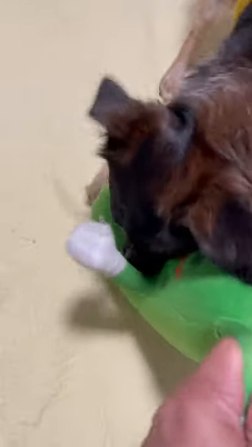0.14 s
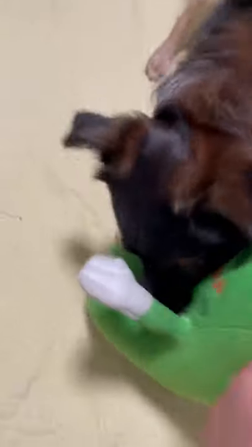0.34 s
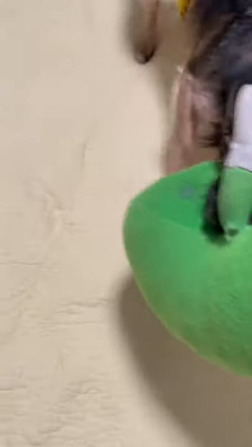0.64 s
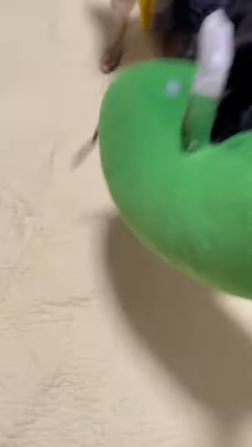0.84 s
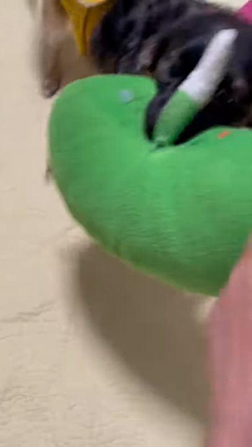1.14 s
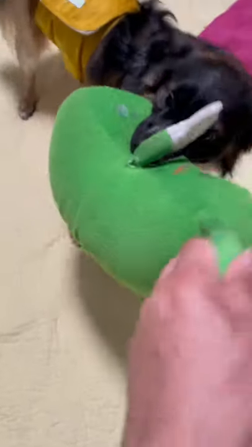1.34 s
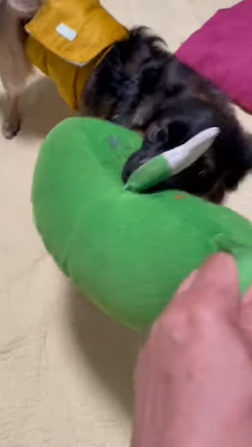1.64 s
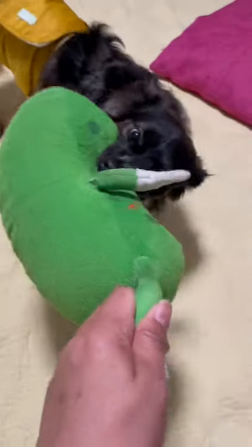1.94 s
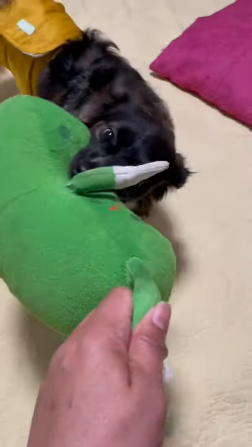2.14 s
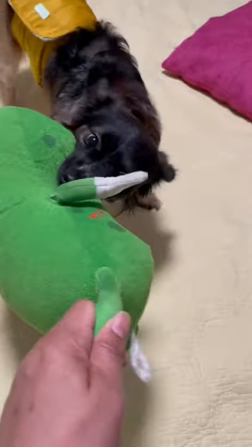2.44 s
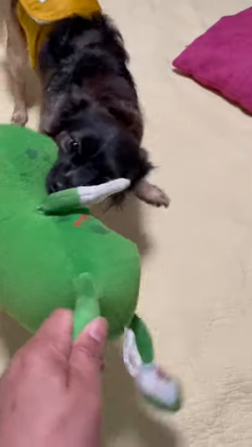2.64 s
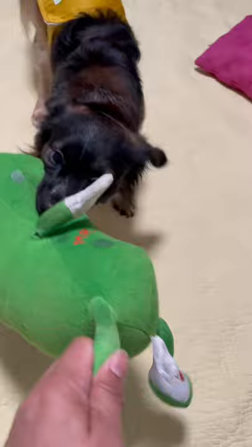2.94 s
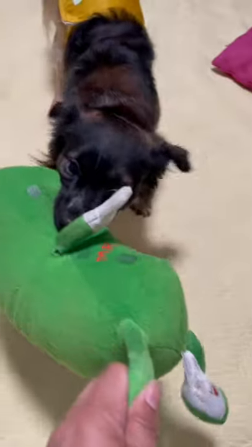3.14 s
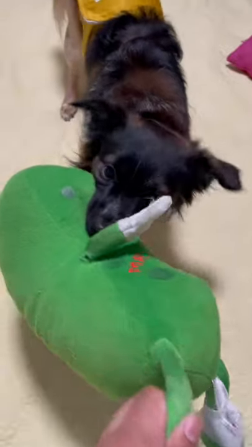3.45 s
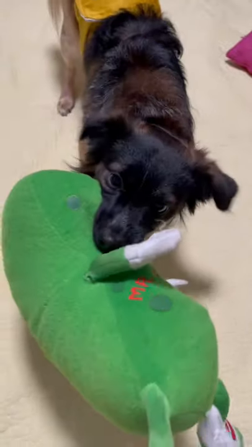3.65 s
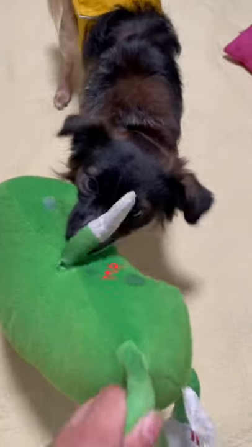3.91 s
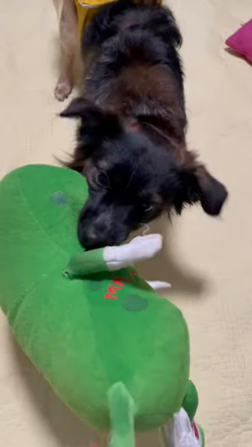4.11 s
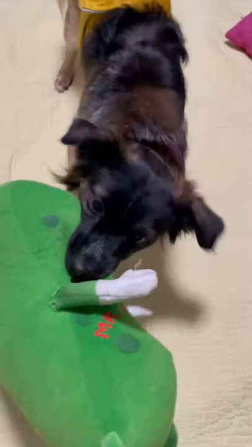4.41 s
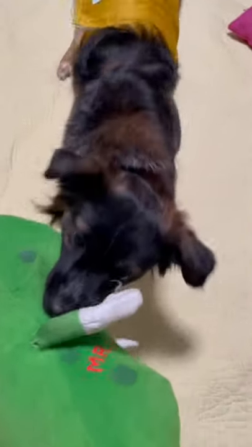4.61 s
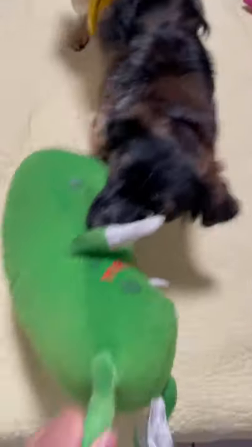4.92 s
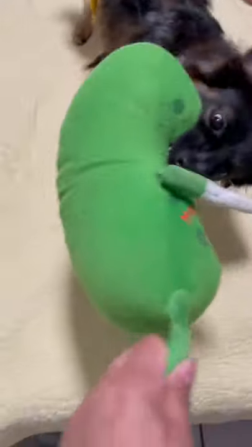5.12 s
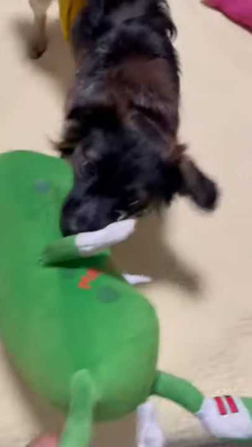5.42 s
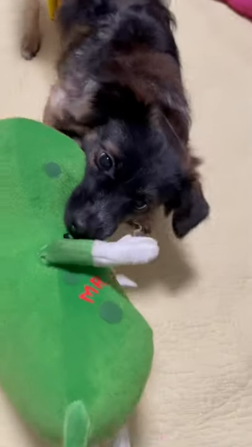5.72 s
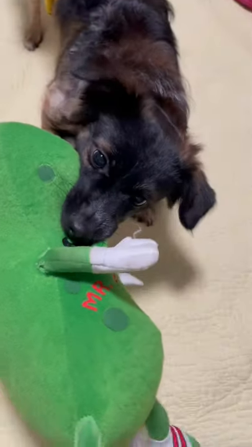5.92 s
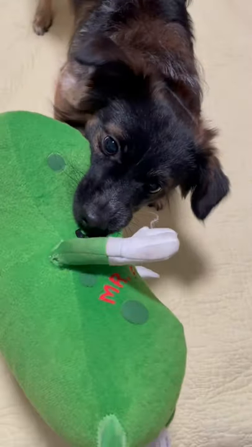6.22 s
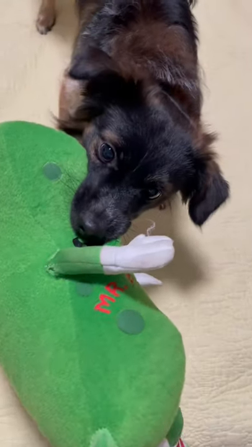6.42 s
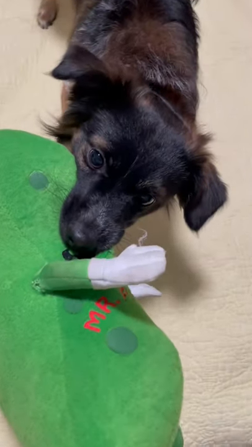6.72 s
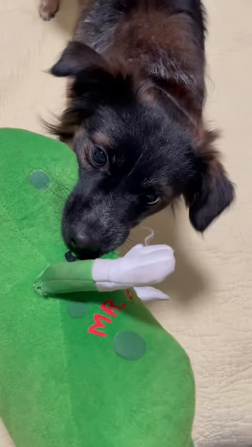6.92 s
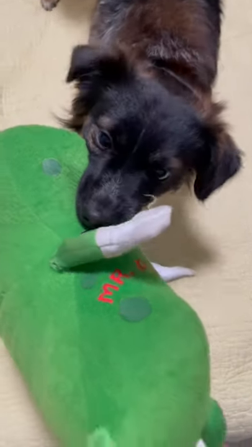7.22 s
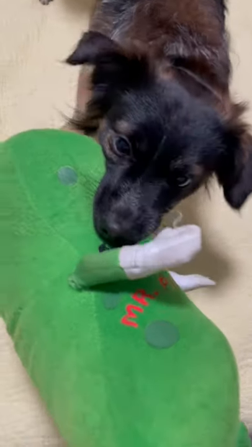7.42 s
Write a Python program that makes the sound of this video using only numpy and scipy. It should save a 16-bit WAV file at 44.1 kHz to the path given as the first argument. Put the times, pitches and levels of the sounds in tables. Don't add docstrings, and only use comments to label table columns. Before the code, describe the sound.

A puppy with a plush toy in its jaws growls close to a phone in a quiet, soft-furnished bedroom. A clipped growl and low mutter lead into the loudest, open-mouthed snarl, then separate bouts follow, some brief, some long and fluttering. One airy sniff falls between them. Fabric rustles softly under the tugging, over a faint low hum and steady hiss.

```python
import sys
import numpy as np
from scipy import signal
from scipy.fft import rfft, irfft, next_fast_len
from scipy.io import wavfile
from scipy.ndimage import map_coordinates

SR = 44100
rng = np.random.default_rng(int(sys.argv[2]) if len(sys.argv) > 2 else 0)


def master_out(mix):
    frames = np.transpose(np.atleast_2d(mix))
    ceiling = np.clip(frames, -1, 1)
    pcm = np.round(ceiling * 32767).astype(np.int16)
    wavfile.write(sys.argv[1], SR, pcm)


def gain_from_db(level_db):
    decades = np.asarray(level_db, float) / 20
    return 10 ** decades


N = 333396

# centre_hz, width_hz, level_db
CHEST = [(105, 55.8, 3), (170, 75.5, 3.5), (258, 49.8, 3), (402.1, 23.6, -5)]
# centre_hz, width_hz, level_db
NOSE = [(1600, 200, 12.5), (1639, 417, 10.5), (2370, 270, 4)]
# time_s, level_db, pitch_hz
MUTTER = [
    (.1, -49, 1890),
    (.16, -42.5, 1747),
    (.3, -49, 1416),
    (.36, -58, 1391),
]
# time_s, peak_db, bright_db
PALATE_SLAPS = [(0.017, -23, -21), (0.076, -33, -19), (0.093, -49, -9), (0.111, -35, -5), (0.127, -34, -8),
                (0.152, -32, -12), (0.17, -30, -15), (0.266, -29.5, -25), (0.298, -30, -18), (0.365, -29, -27),
                (0.407, -22, -18), (0.419, -15.5, -20), (0.432, -6.5, -27), (0.458, -7.5, -31),
                (0.497, -6.5, -29), (0.567, -14, -13), (0.618, -37, -18), (0.66, -15, -13), (0.711, -27, -18),
                (0.728, -30, -25), (0.799, -20, -21), (0.872, -27, -8), (0.908, -26, -6), (0.93, -31, -18),
                (0.946, -23, -4), (0.963, -26, -15), (0.99, -30, -19), (1.012, -17.5, -11), (1.03, -44, -8),
                (1.055, -30, -11), (1.073, -33, -4.5), (1.099, -30, -9), (1.115, -33, -22), (1.135, -37, -20),
                (1.155, -38, -21), (1.175, -23, -18), (1.202, -28, -29), (1.227, -25, -14.5), (1.266, -37, -4),
                (1.285, -38, -13), (1.332, -49, -14), (1.343, -46, -7),
                (1.735, -43, -11), (1.755, -32, -18), (1.763, -28, -24), (1.797, -27.5, -14), (1.872, -23, -10),
           (1.914, -30, -17), (1.96, -39, -16), (1.971, -39, -23), (2.02, -34, -30), (2.057, -48, -19),
           (2.123, -32, -35), (2.245, -47, -9), (2.537, -39.5, 3.5), (2.555, -26, -13), (2.575, -32.5, 2),
           (2.591, -20.5, -9), (2.611, -27.5, -1), (2.633, -22, -28), (2.659, -29, -3), (2.71, -43, -3),
           (2.735, -34, -6), (2.754, -32.5, -14), (2.779, -31, -5), (2.817, -33, -4), (3.352, -39, 0),
           (3.371, -27, -7.5), (3.416, -28, -9), (3.449, -45, -8), (3.523, -21.5, -9), (3.564, -29.5, -1.5),
           (3.585, -23, -18), (3.608, -33, -13), (3.628, -27.5, -28), (3.663, -28, -19), (3.674, -27, -6),
           (3.696, -25.5, -4.5), (3.718, -27, -19), (3.739, -28.5, -9.5), (3.782, -30, -13),
           (3.801, -28, -8.5), (3.835, -29, -24), (3.859, -35, -8), (3.871, -31, -3), (3.903, -27, -21),
           (3.936, -30, -22), (3.96, -37, -19),
                (4.335, -34, -1), (4.351, -30, -12), (4.381, -18, -21), (4.444, -16.5, -15), (4.474, -14.5, -13),
           (4.515, -23, -10), (4.546, -21, -4), (4.568, -22.5, -10), (4.592, -30, 3), (4.627, -37, 1.5),
           (4.642, -33, 3), (4.666, -34, 2), (4.68, -30.5, -0.5), (4.712, -29.5, -8), (4.751, -24.5, -5.5),
           (4.798, -28.5, -14), (5.082, -42, -14), (5.119, -37, -14), (5.15, -38, -10), (5.244, -32, 2),
           (5.301, -39, -17), (5.315, -34, -3), (5.371, -39, -14), (5.439, -50, 10), (5.566, -39, -7),
           (5.594, -48, -14), (5.624, -19.5, -13), (5.642, -25.5, -6), (5.658, -24, -17), (5.68, -33, 2),
           (5.824, -28.5, -17), (5.863, -29, -9), (5.902, -31, -12), (5.941, -38, -9), (5.97, -43, -7),
           (5.984, -29.5, -18), (6.032, -29.5, -23), (6.074, -34, -19), (6.195, -36, -22),
           (6.237, -32, -26), (6.256, -40, -18), (6.285, -43, -16),
                (6.783, -45, -2), (6.797, -38, -5), (6.82, -42, 2), (6.837, -28, -10), (6.871, -22, -8),
           (6.889, -34, -8), (6.925, -20, -9), (6.952, -27.5, -2.5), (6.983, -25.5, -6.5),
           (7.013, -38, -16), (7.036, -36.5, 5), (7.074, -33, -10), (7.091, -35, -23), (7.112, -24, -5.5),
           (7.128, -19.5, -12), (7.15, -25.5, -6), (7.174, -26, -15), (7.194, -25, -7.5), (7.213, -31, -23),
           (7.233, -27, -4.5), (7.275, -38, -6), (7.308, -37.5, -2), (7.391, -39, -10), (7.428, -32, -19),
           (7.447, -43, -10)]
SINGLE_SLAPS = np.array(PALATE_SLAPS)


def growl(jitter=.08, weak_db=-7, scatter_db=1.9, flutter_db=2.2, spit_db=1, breath=.22):
    # time_s, effort_db, fold_rate_hz, mouth_opening_db
    loudest = [
        [(.415, -31, 213.5, -14), (.44, -25.5, 269.5, 2.5), (.47, -32, 225.4, -1.5), (.5, -29, 203.5, -3),
         (.525, -29, 164.9, 1), (.57, -25.5, 148, -7), (.62, -27, 177, -4), (.69, -29.5, 189.8, -4),
         (.78, -32.5, 153.6, -2)],
        [(.795, -31, 166.3, -7.5), (.87, -32, 149.4, -7.5), (.95, -32.5, 139.5, -10.5),
         (1.03, -33, 160.4, -6.5), (1.13, -34.5, 190.7, -24), (1.2, -34, 141.5, -14.5),
         (1.25, -33.5, 192.7, -15), (1.3, -35, 162, -16), (1.36, -33.5, 158.1, -12)],
    ]
    # time_s, effort_db, fold_rate_hz, mouth_opening_db
    long_growls = [
        [(3.38, -34, 178.4, -17), (3.422, -37.5, 177.3, -12.5), (3.458, -35.5, 149.4, -9),
         (3.482, -34, 150.8, -15), (3.548, -35.5, 183.1, -16), (3.864, -36, 163.3, -20.5),
         (3.99, -40.5, 150.8, -23)],
        [(4.35, -35, 176.8, -13), (4.396, -30.5, 172.6, -12.5), (4.47, -28.5, 180.3, -16.5),
         (4.506, -27.5, 147.3, -18.5), (4.686, -34, 185.9, -20), (4.788, -30, 147, -25),
         (4.8, -36, 150.3, -16.5)],
        [(5.595, -36.5, 171.2, -15), (5.659, -33, 148.5, -13.5), (5.869, -39.5, 156.9, -17),
         (5.961, -36.5, 148, -19.5), (6.003, -42.5, 129.9, -42), (6.235, -44, 160.3, -17),
         (6.29, -42, 151.3, -40)],
        [(6.825, -39, 142.2, -7), (6.905, -36, 136.5, -14.5), (7.017, -34.5, 170, -18),
         (7.095, -32.5, 171, -12), (7.135, -31.5, 145.8, -33), (7.273, -41, 133.3, -7.5),
         (7.4, -39.5, 148, -18.5), (7.475, -46.5, 147.4, -16)],
    ]
    # time_s, effort_db, fold_rate_hz, mouth_opening_db
    short_growls = [
        [(0.0, -13, 200.8, -27), (0.024, -41, 193, -1.5), (0.05, -42.5, 196, -2.5)],
        [(0.11, -32, 182.6, -11), (0.168, -31, 174.3, -17), (0.242, -35.5, 194.8, -8), (0.33, -45, 184.3, -12)],
        [(1.76, -35.5, 182.4, -16.5), (2.024, -38.5, 184.6, -29), (2.076, -39, 152.8, -36),
         (2.16, -43, 157.9, -29)],
        [(2.57, -34, 157.8, -18), (2.656, -36, 155.8, -5.5), (2.73, -37, 182.2, -5.5),
         (2.8, -37.5, 149.3, -6.5)],
        [(3.07, -56, 137, 6), (3.1, -54, 134.5, 0), (3.11, -44.5, 136.2, -15)],
        [(5.11, -37.5, 173.2, -19), (5.198, -37, 181.7, -9.5), (5.236, -33, 156.6, -23),
         (5.36, -42.5, 161.8, -7.5)],
    ]
    # centre_hz, width_hz, level_db
    throat_modes = [(385, 114, 0)]
    growls = sorted(loudest + long_growls + short_growls)

    rate_hz = curve(np.vstack(growls), 2)
    turns = np.cumsum(rate_hz * (1 + jitter * wobble(90) + .045 * wobble(30))) / SR
    beats = np.flatnonzero(np.diff(np.floor(turns)))
    chance = rng.standard_normal((N // 100, 2))[:len(beats)]
    weak = np.arange(len(beats)) % 2

    flutter = np.sin(2 * np.pi * np.cumsum(26 + 7 * wobble(12)) / SR)
    flutter = flutter * (1.55 + 0.91 * wobble(6.9))
    flutter = np.clip(flutter, -1.5, .8) * (chop() == 0)

    folds, spits = np.zeros(N), np.zeros(N)
    folds[beats] = gain_from_db(weak_db * weak + scatter_db * chance[:, 0] + flutter_db * flutter[beats])
    spits[beats] = gain_from_db(-7 * weak + spit_db * chance[:, 1] + 1.4 * flutter[beats])
    boom = unit(steep(resonant(folds, CHEST), 74, 469))
    chest = strained(boom, level(growls)) * gain_from_db(2 * chop())

    puffs = unit(puffed(spits, .0045))
    stream = unit(gain_from_db(3.5 * flutter) * rng.standard_normal(N))
    low = .7 * unit(spits) + .7 * puffs + .7 * breath * stream
    high = .3 * unit(spits) + puffs + 1.8 * breath * stream
    opening = gaps()
    low, high = opening * low, opening * high

    mouth = unit(mouthed(low, 473, 1540)) * outlet(growls, follows=0.51, axis=0)
    nose = unit(steep(resonant(high, NOSE), 1570, 2550)) * outlet(growls, follows=1.19, axis=1)
    muzzle = unit(steep(muzzled(high), 2530, 7400)) * outlet(growls, follows=1.65, axis=2)
    throat = unit(resonant(resonant(folds, throat_modes), throat_modes))
    throat = throat * outlet(growls, follows=0, axis=3) * gain_from_db(chop())
    caught = catches()
    chest, mouth = turned(chest) * caught, mouth * caught
    return gain_from_db(-10.5) * mouth - gain_from_db(0.15) * chest + gain_from_db(-18) * nose + gain_from_db(-13.5) * muzzle + throat


def strained(chest, gain):
    split_hz, from_db, strain_db_per_db = 213, -33, 0.54
    low = filtered(chest, lambda hz: 1 / (1 + (hz / split_hz) ** 4))
    tilt = np.clip(gain / gain_from_db(from_db), .3, 3) ** strain_db_per_db
    return gain * (low / tilt + (chest - low) * tilt)


def outlet(growls, follows, axis):
    # mouth_db, nose_db, muzzle_db, throat_db
    grips = [(-13, -4, -26.5, -16), (-10.5, -23, -30, -7.5), (-3, -3, -21.5, -8.5), (-5, -2.5, -12, -18),
             (0.5, 7, 6, -14), (-3.5, -2, -14.5, -15.5), (-5, -10, -12, -22), (-1, 2, -1.5, -14.5),
             (0.5, 5.5, 8, -15), (0.5, 7.5, -2, -13), (-3.5, 1, 1, -13.5), (-1, 5.5, -1.5, -11.5)]
    tables = []
    for rows, grip in zip(growls, grips):
        tables.append([(s, db + follows * (open_db + 12) + grip[axis]) for s, db, _, open_db in rows])
    return level(tables)


def catches():
    # time_s, length_s, level_db
    breaks = [
        (0.61, 0.0084, -1),
        (1.274, 0.0088, -13),
        (1.322, 0.0099, -9),
        (3.541, 0.0051, -9),
        (4.612, 0.0082, -7),
        (4.709, 0.0066, -17),
        (5.804, 0.011, -11),
        (6.021, 0.0092, -8),
        (6.142, 0.019, -16),
    ]
    t = np.arange(N) / SR
    return gain_from_db(sum(db * np.exp(-((t - s) / length) ** 2) for s, length, db in breaks))


def gaps():
    leak, gap_s = 1.1, .015
    marks = np.zeros(N)
    marks[np.round(SINGLE_SLAPS[:, 0] * SR).astype(int)] = 1
    bell = signal.windows.hann(round(gap_s * SR))
    return leak + np.clip(signal.fftconvolve(marks, bell, "same"), 0, 1)


def chop():
    depth_db, rate_hz, from_s = 4, 32.6, .128
    t = np.arange(N) / SR
    during = (t > MUTTER[0][0]) * (t < MUTTER[-1][0])
    return depth_db * np.cos(2 * np.pi * rate_hz * (t - from_s)) * during


def mouthed(x, lo_hz, hi_hz):
    # centre_hz, width_hz, level_db
    muffled_modes = [(604, 93, -3.5), (879, 222, 4), (1039.6, 400, 2.5), (1348, 207, 4.5)]
    # centre_hz, width_hz, level_db
    wide_modes = [(610, 370, 5), (845, 288, 7), (1524, 290, 4)]
    # centre_hz, width_hz, level_db
    gape_modes = [(647, 200, 1), (890, 300, 5.5), (1070, 330, 5.5), (1425, 250, -0.5)]
    # time_s, wide_share (0-1)
    wide_share = [
        (.72, 0.07),
        (.85, 0.85),
        (1.1, 0.9),
        (1.25, 0.44),
    ]
    # time_s, gape_share (0-1)
    gape_share = [
        (.39, 1),
        (.55, 0.98),
        (.75, 0.2),
        (.8, 0.01),
    ]
    gape = np.clip(curve(gape_share, 1, 0), 0, 1)
    wide = np.clip(curve(wide_share, 1, 0.04) + 0.16 * wobble(8), 0, 1) * (1 - gape)
    muffled = resonant(x * (1 - wide - gape), muffled_modes)
    return steep(muffled + resonant(x * wide, wide_modes) + resonant(x * gape, gape_modes), lo_hz, hi_hz)


def muzzled(x):
    # centre_hz, width_hz, level_db
    muzzle_modes = [(2602, 198, 7), (3015, 520, 5), (3310, 590, 1), (5140, 740, -11.5)]
    sinus_hz, width_hz, depth_db = 4500, 2350, -8

    def dip(hz):
        off, loss = sinus_hz ** 2 - hz * hz, 1j * hz * width_hz
        return (off + loss * gain_from_db(depth_db)) / (off + loss)

    return filtered(resonant(x, muzzle_modes), dip)


def palate():
    s, db, bright_db = slaps().T
    at = np.round(s * SR).astype(int)
    lean_db = 2 * rng.standard_normal(len(s))
    low, nasal, front = np.zeros((3, N))
    low[at] = gain_from_db(db)
    nasal[at] = gain_from_db(db + bright_db + lean_db)
    front[at] = gain_from_db(db + bright_db - lean_db)

    def hiss(x):
        return -.12 * x + .17 * puffed(np.roll(x, 20), .011)

    click = -low + .065 * puffed(np.roll(low, -50), .007)
    bright = steep(resonant(hiss(nasal), NOSE) + muzzled(hiss(front)), 1110, 7800)
    thump = gain_from_db(20.5) * turned(steep(resonant(low, CHEST), 120, 710))
    return gain_from_db(20) * mouthed(click, 307, 2100) + gain_from_db(17) * bright + thump


def slaps():
    # first_s, last_s, rate_hz, peak_db, bright_db
    rattles = [(0.44, 0.485, 90, -8.5, -19.5), (0.511, 0.523, 60, -18, -29), (0.586, 0.595, 75, -22, -12),
               (0.627, 0.691, 72, -20, -14), (3.85, 3.89, 65, -45, -20), (3.464, 3.485, 50, -30.5, -5),
               (3.386, 3.399, 70, -42, 3), (3.614, 3.642, 85, -40, -28), (4.39, 4.433, 75, -29.5, -7),
               (4.487, 4.504, 75, -22.5, -25), (5.842, 5.884, 65, -39, -7), (6.192, 6.226, 60, -44, -18),
               (1.808, 1.853, 70, -35, 1.5), (2.032, 2.101, 60, -41, -28), (4.528, 4.534, 100, -22, -13),
               (7.33, 7.374, 65, -38.5, 0)]
    jitter_s, scatter_db = .001, 1.5
    rows = []
    for first, last, rate, db, bright_db in rattles:
        count = round((last - first) * rate) + 1
        rows += [(s, db, bright_db) for s in np.linspace(first, last, count)]
    scatter = rng.standard_normal((len(rows), 3)) * [jitter_s, scatter_db, scatter_db]
    return np.vstack([SINGLE_SLAPS, rows + scatter])


def mutter():
    return narrow(MUTTER, width_hz=660) * gain_from_db(0.86 * chop())


def spray():
    # time_s, length_s, level_db
    sprays = [(2.545, 0.01, -51), (1.82, .04, -51), (7.48, 0.017, -57), (3.36, 0.014, -54),
              (4.33, 0.0095, -52), (4.815, .012, -49), (5.09, .012, -58), (5.375, 0.015, -47),
              (5.575, 0.014, -65), (5.7, 0.03, -41), (5.88, 0.042, -58), (.46, 0.021, -62),
              (2.6, 0.029, -45.5), (3.47, 0.018, -50), (3.685, 0.017, -54), (3.8, 0.012, -63),
              (3.87, .012, -61), (4.39, 0.038, -44), (4.595, 0.0063, -46), (4.63, 0.0076, -39),
              (4.765, .005, -46), (4.72, 0.011, -41.5), (4.8, 0.0094, -43), (5.255, 0.015, -44.5),
              (5.77, 0.01, -42.5), (6.89, .015, -38.5), (7.037, 0.0074, -40.5), (7.197, 0.01, -46)]
    # centre_hz, width_hz, level_db
    teeth = [(1820, 550, 7), (3070, 620, 6), (5080, 450, -1.5)]
    jet = steep(resonant(rng.standard_normal(N), teeth), 1600, 5400)
    return unit(jet) * swells(sprays, -120)


def rings():
    # time_s, pitch_hz, length_s, level_db
    pings = [(0.568, 1984, 0.0028, -25), (1.013, 1456, 0.0036, -31.5), (1.039, 1610, 0.0029, -43),
             (1.054, 1560, .004, -41), (1.1, 1528, 0.0029, -38), (1.305, 1660, 0.0059, -45),
             (1.817, 1859, 0.0071, -42), (4.591, 1873, 0.0019, -29), (4.643, 2912, 0.0028, -26),
             (4.722, 3260, 0.0024, -41), (7.132, 1282, .003, -35.5)]
    t = np.arange(N) / SR
    out = np.zeros(N)
    for s, hz, length, db in pings:
        out += gain_from_db(db) * np.exp(-((t - s) / length) ** 2) * np.sin(2 * np.pi * hz * (t - s))
    return out


def sniff():
    # start_s, end_s, level_db
    sniffs = [
        (2.807, 3.125, -51.5),
        (3.146, 3.16, -66),
        (4.861, 4.906, -60),
    ]
    # centre_hz, width_hz, level_db
    nostril = [(430, 100, -5), (710.4, 240, -2.5), (1006, 170, 1), (1834, 290, 1.5), (2770, 370, 1),
               (3370, 400, -6)]
    breath = gain_from_db(0.72 * wobble(24.88)) * rng.standard_normal(N)
    gain = level([[(start, db), (end, db)] for start, end, db in sniffs])
    return gain_from_db(3.5) * unit(resonant(resonant(breath, nostril), nostril)) * gain


def whistle():
    # time_s, level_db, pitch_hz
    edge_tone = [
        (2.8, -66, 4430),
        (2.89, -52.5, 4570),
        (2.95, -62, 4625),
        (3.09, -62, 4560),
    ]
    return narrow(edge_tone, width_hz=172)


def cloth():
    # time_s, length_s, rustle_db
    tugs = [(0, 0.011, -44.5), (.5, 0.44, -54), (.9, 0.48, -55), (1.84, 0.049, -56), (2.6, 0.074, -54),
            (2.97, .12, -64), (3.52, 0.069, -54.5), (4.08, 0.043, -53.5), (4.5, .25, -54),
            (5.23, 0.19, -55.5), (5.445, 0.05, -52.5), (5.69, 0.13, -49.5), (6.88, 0.039, -56),
            (7.07, .12, -52)]
    # freq_hz, density_db (dB per Hz)
    fabric = [(300, 17), (1500, 12.5), (3500, 11), (5200, 10.5), (7500, 10), (11000, 10), (15500, -31)]
    fibres = gain_from_db(2.7 * wobble(40) + 2.3 * wobble(300)) * rng.standard_normal(N)
    rustle = unit(filtered(fibres, lambda hz: gain_from_db(along(fabric, hz))))
    return gain_from_db(-1.5) * swells(tugs, rest_db=-62) * rustle


def machine():
    # centre_hz, width_hz, level_db
    hum = [(56, 9.7, -0.5), (122.2, 18, -2), (171.5, 7.5, -1), (234, 80, -12.5)]
    # time_s, length_s, level_db
    surges = [
        (.27, .1, -47),
        (2.9, .1, -59),
        (4.15, .12, -52),
        (4.7, .41, -54),
        (6.0, .15, -58),
        (6.97, .1, -54),
    ]
    drone = resonant(resonant(rng.standard_normal(N), hum), hum)
    return swells(surges, rest_db=-60) * gain_from_db(3 + 2.5 * wobble(4.3)) * unit(drone)


def air():
    # freq_hz, density_db (dB per Hz)
    air_mid = [(30, -100), (60, -84.5), (200, -83.5), (500, -96.5), (1300, -100), (2200, -95.5),
               (4000, -99), (5300, -96), (6500, -101), (7600, -119), (10300, -99), (12600, -106),
               (14400, -128), (15300, -107)]
    # freq_hz, density_db (dB per Hz)
    air_side = [(30, -114), (100, -100), (400, -95.5), (1000, -101), (1800, -100), (2800, -96),
                (4200, -100), (5600, -101), (7500, -99), (9500, -103), (11300, -118), (13000, -105),
                (14500, -100), (15600, -102)]
    top_hz, waver_db = 13800, 3
    noise = rng.standard_normal((2, N))
    mid, side = filtered(noise, lambda hz: gain_from_db([along(air_mid, hz), along(air_side, hz)]))
    mid = mid + filtered(mid, lambda hz: hz > top_hz) * (gain_from_db(waver_db * wobble(9)) - 1)
    return np.sqrt(SR / 2) * np.array([mid + side, mid - side])


def ports(x):
    # freq_hz, left_minus_right_db
    lean = [(100, 0), (330, -1), (770, -3.5), (1200, -3), (1800, -1.5), (2800, 2), (4000, 0)]
    # freq_hz, left_lead_rad
    lead = [(0, 0), (520, -.1), (1800, .1), (2400, 1.3), (3400, 1.5), (5400, .4), (7600, 3.1), (11200, 6.3),
            (14300, 9.4)]

    def both(hz):
        half = gain_from_db(along(lean, hz) / 2) * np.exp(.5j * along(lead, hz))
        return np.array([half, 1 / half])

    return filtered(x, both)


def bedroom(x, alike=.88):
    # freq_hz, t60_s
    decay = [(150, 0.19), (1500, 0.13), (6000, 0.044)]
    hz, t, z = signal.stft(rng.standard_normal((3, SR // 3)), SR, nperseg=256)
    fading = z * gain_from_db(-60 * t / along(decay, hz)[:, None])
    a, b, c = signal.istft(fading, SR, nperseg=256)[1]
    tail = alike * a + (1 - alike) * np.array([b, c])
    late = np.pad(x, (200, 0))[None]
    return signal.fftconvolve(late, tail / np.linalg.norm(tail[0]), axes=1)[:, :N]


def unit(x):
    return x / np.sqrt(np.mean(x ** 2) + 1e-20)


def along(points, hz):
    f, v = np.transpose(points)
    return np.interp(np.log(hz + 1), np.log(f + 1), v)


def curve(rows, column, rest=None):
    rows = np.array(rows)
    return np.interp(np.arange(N) / SR, rows[:, 0], rows[:, column], rest, rest)


def held(rows):
    attack_s, release_s, edge_db = 0.047, 0.041, -32
    rows = np.array(rows, float)
    before, after = rows[0].copy(), rows[-1].copy()
    before[:2] += -attack_s, edge_db
    after[:2] += release_s, edge_db
    return np.vstack([before, rows, after])


def level(tables):
    return sum(gain_from_db(curve(held(rows), 1, -200)) for rows in tables)


def swells(rows, rest_db):
    t = np.arange(N) / SR
    power = sum(gain_from_db(db) ** 2 * np.exp(-2 * ((t - s) / length) ** 2) for s, length, db in rows)
    return np.sqrt(gain_from_db(rest_db) ** 2 + power)


def wobble(rate):
    return map_coordinates(rng.standard_normal(int(N * rate / SR) + 4), [np.arange(N) * rate / SR])


def filtered(x, response):
    m = next_fast_len(N + SR // 2)
    return irfft(rfft(x, m) * response(np.fft.rfftfreq(m, 1 / SR)), m)[..., :N]


def resonant(x, modes):
    def response(f):
        total = 0
        for k, (c, w, db) in enumerate(modes):
            total = total + (-1) ** k * gain_from_db(db) * 1j * f * w / (c * c - f * f + 1j * f * w)
        return total

    return filtered(x, response)


def steep(x, lo_hz, hi_hz):
    return signal.sosfilt(signal.butter(3, [lo_hz, hi_hz], "bandpass", fs=SR, output="sos"), x)


def turned(x):
    turn_rad = -1.2
    return filtered(x, lambda hz: np.exp(1j * turn_rad) + 0 * hz)


def puffed(x, seconds):
    bell = signal.windows.hann(round(seconds * SR))
    return signal.fftconvolve(x, bell, "same") * rng.standard_normal(N)


def narrow(rows, width_hz):
    noise = rng.standard_normal((2, N))
    a, b = filtered(noise, lambda hz: 1 / (1 + (2 * hz / width_hz) ** 2))
    turn = 2 * np.pi * np.cumsum(curve(rows, 2)) / SR
    return unit(a * np.cos(turn) + b * np.sin(turn)) * level([rows])


def scene():
    dog = growl() + palate() + mutter() + spray() + rings() + sniff()
    near = ports(dog + cloth()) + ports(whistle())
    return near + gain_from_db(-14.5) * bedroom(dog) + machine() + air()


def low_pass(x):
    return signal.sosfilt(signal.butter(12, 15800, fs=SR, output="sos"), x)


def record(dry):
    return low_pass(dry)


dry = scene()
out = record(dry)
master_out(out)
```